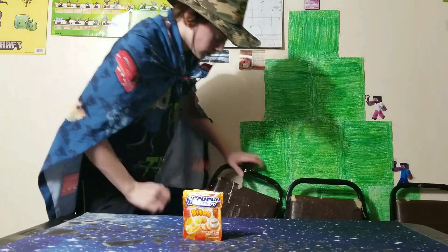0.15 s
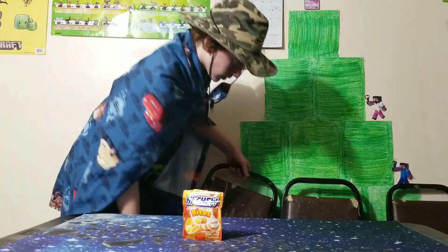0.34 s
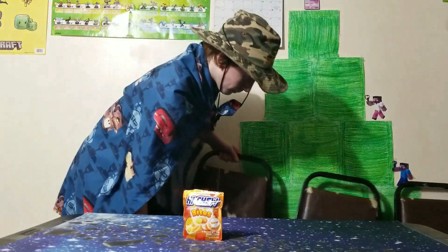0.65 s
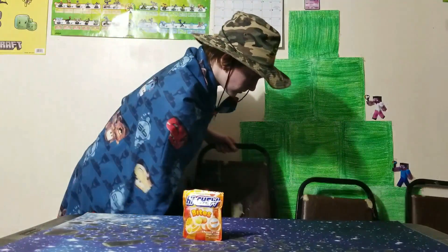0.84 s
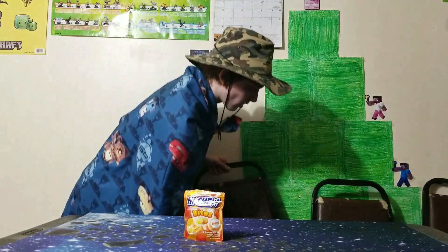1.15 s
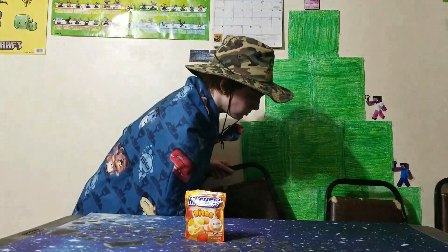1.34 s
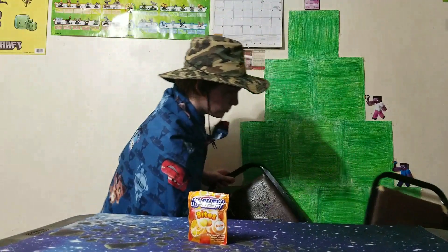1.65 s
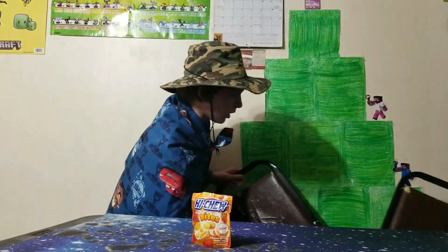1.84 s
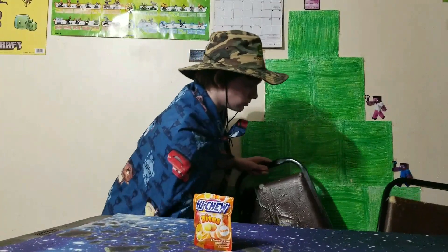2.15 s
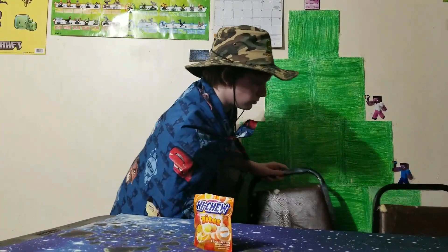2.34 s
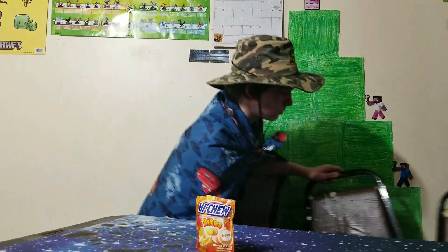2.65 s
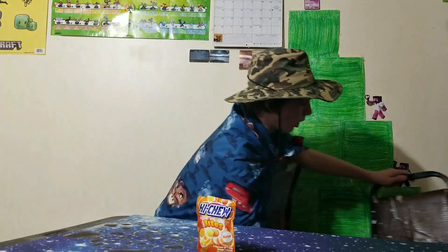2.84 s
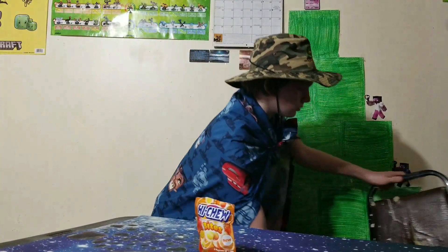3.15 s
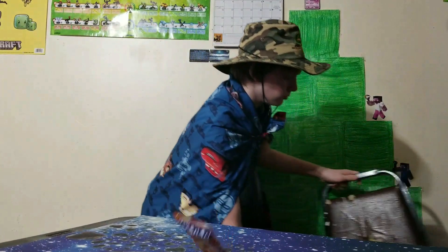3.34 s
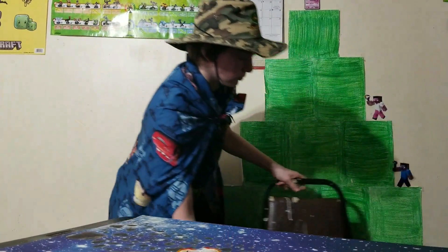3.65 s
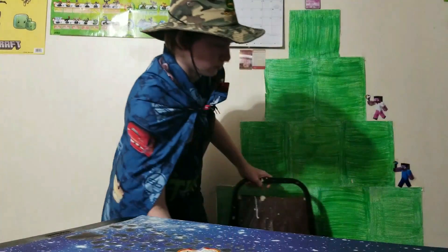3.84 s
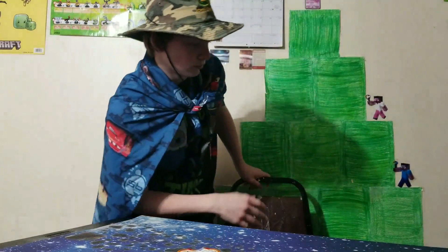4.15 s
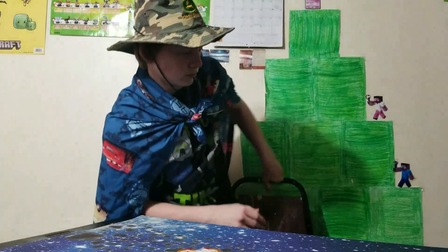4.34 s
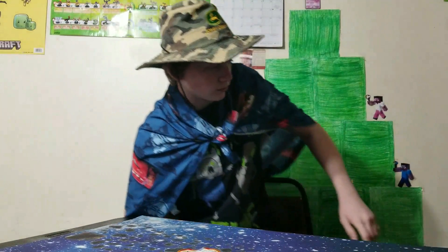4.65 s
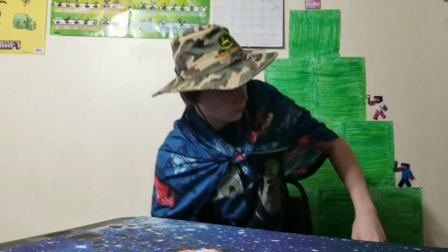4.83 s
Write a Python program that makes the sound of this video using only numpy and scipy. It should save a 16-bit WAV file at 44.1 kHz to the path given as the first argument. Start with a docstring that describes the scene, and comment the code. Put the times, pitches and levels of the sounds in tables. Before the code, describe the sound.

A padded metal-framed chair is dragged in juddering, scraping jerks across a hard floor, clanking and squealing, then stops with two light taps.

```python
"""A small room with a hard floor: a padded chair with a steel tube frame is dragged, a few steps from a camera.
Its feet stick and slip: bunched random slips judder the chair, scrape through its legs and crackle on grit.
The seat drones as a wavering sine, feet squeal and legs sing as uneven tones, and legs knock and clank as
filtered blows. The slide dies away into two light taps, over room air, a swishing cape and soft shuffling."""
import sys
import numpy as np
from scipy import signal
from scipy.fft import rfft, irfft, next_fast_len
from scipy.io import wavfile
from scipy.ndimage import map_coordinates

SR = 44100
rng = np.random.default_rng(int(sys.argv[2]) if len(sys.argv) > 2 else 0)


def dump_mix(stems):
    """Bounce the given channels to the path in sys.argv[1] as a 16-bit WAV at rate SR."""
    frames = np.atleast_2d(stems).T  # one column per channel
    limited = np.clip(frames, -1, 1)  # hard clip at full scale
    pcm = np.round(limited * 32767).astype(np.int16)
    wavfile.write(sys.argv[1], SR, pcm)


N = 219882  # length [samples]
TIME = np.arange(N) / SR  # [s]


def amp(db):
    """Decibels to gain."""
    return 10 ** (np.asarray(db) / 20)


def unit(x):
    """Scaled to rms 1."""
    return x / np.sqrt(np.mean(x ** 2) + 1e-20)


def along(points, hz):
    """(frequency [Hz], value) points read on a log frequency axis."""
    f, value = np.transpose(points)
    return np.interp(np.log(hz + 1), np.log(f + 1), value)


def wobble(rate):
    """A smooth random curve, rate knots a second."""
    knots = rng.standard_normal(int(N * rate / SR) + 4)
    return map_coordinates(knots, [np.arange(N) * rate / SR])


def swell(start, length, rise, fall):
    """A gain that rises from start, holds until length has passed, then dies away; all in seconds."""
    t = TIME - start
    return np.clip(t / rise, 0, 1) * np.exp(-np.maximum(t - length, 0) / fall)


def filtered(x, response):
    """x through a response given as a function of frequency, real or complex."""
    n = x.shape[-1]
    size = next_fast_len(n + SR // 2)
    return irfft(rfft(x, size) * response(np.fft.rfftfreq(size, 1 / SR)), size)[..., :n]


def coloured(x, level_db, size=4096):
    """x through a causal (minimum-phase) filter whose dB gain is a function of frequency."""
    cepstrum = irfft(np.log(amp(level_db(np.fft.rfftfreq(size, 1 / SR))) + 1e-6))
    # folding the cepstrum onto positive times makes the filter causal
    cepstrum[1:size // 2] *= 2
    cepstrum[size // 2 + 1:] = 0
    impulse = irfft(np.exp(rfft(cepstrum)))
    return signal.fftconvolve(x, impulse)[:len(x)]


def add(track, start, sound):
    """Mix a sound into a track at a time in seconds."""
    part = track[max(0, round(start * SR)):][:len(sound)]
    part += sound[:len(part)]


def uneven_tone(hz, rough, pitch_rate, swing_db, swing_rate):
    """A sine at rms 1 whose pitch and level both waver at random."""
    phase = 2 * np.pi * np.cumsum(hz * (1 + rough * wobble(pitch_rate))) / SR
    return unit(np.sin(phase) * amp(swing_db * wobble(swing_rate)))


def contact(t60, chatter, rise=0.01, count=8192):
    """A sharp push followed by the dying chatter of loose joints; energy 1."""
    t = np.arange(count) / SR
    tail = rng.standard_normal(count) * amp(-60 * t / t60) * (1 - np.exp(-t / rise))
    blow = chatter * tail / np.linalg.norm(tail) + (t == 0)
    return blow / np.linalg.norm(blow)


# likeness of the two microphone ports: (frequency [Hz], left-right correlation)
PORT_LIKENESS = [(100, .98), (200, 0.98), (350, 0.87), (700, 0.57), (1400, -0.29), (3000, -0.003),
                 (12000, -0.28)]


def spread(pair):
    """Two unrelated signals become a stereo pair, alike in the bass."""
    def turn(f):
        return np.arccos(np.clip(along(PORT_LIKENESS, f), -1, 1)) / 2
    mid, side = filtered(pair, lambda f: np.array([np.cos(turn(f)), np.sin(turn(f))]))
    return np.array([mid + side, mid - side])


def hush(spectrum):
    """Steady stereo noise of a given spectrum, at rms 1."""
    noise = rng.standard_normal((2, N))
    return unit(spread(filtered(noise, lambda f: amp(along(spectrum, f)))))


# still air in the room: (frequency [Hz], relative density [dB per Hz])
AIR_SPECTRUM = [(15, -43), (25, -5.5), (142, 1), (373, -11.5), (572, -18), (1150, -14), (1240, -24.5),
                (1460, -11), (3620, -24), (13800, -21.5), (15000, -31)]


def room_air():
    """Still room air as steady noise, mostly low."""
    return amp(-67.0) * hush(AIR_SPECTRUM)


def shuffling():
    """Soft low noise that fades in and wavers: shuffling once the chair stands."""
    shuffle = [(30, -2), (100, 6.5), (300, -8), (1000, -10.0), (4000, -14.5), (14000, -29.0)]
    fade_in = np.clip((TIME - 4.39) / 0.16, 0, 1)  # start and rise [s]
    return fade_in * amp(-62 + 1.8 * wobble(25)) * hush(shuffle)


# swishes of a cloth cape: (time [s], length [s], level [dB])
CAPE_SWISHES = [(-.02, 0.034, -34), (.11, 0.067, -54), (0.218, .12, -48.5), (.41, .05, -57),
                (0.482, 0.027, -26), (.6, .1, -58), (4.05, .17, -72), (4.42, .04, -69)]


def cape():
    """A cloth cape rubs on itself: bright noise in short swells."""
    cloth = [(300, -21.5), (2000, -5.0), (5000, -4), (9000, -3.0), (14000, -2.0)]
    swish = sum(amp(db) * swell(start, length, rise=0.016, fall=0.035) for start, length, db in CAPE_SWISHES)
    return swish * amp(1.2 * wobble(120)) * hush(cloth)


def background():
    """Everything heard around the chair."""
    return room_air() + shuffling() + cape()


# light taps on the seat and table: (time [s], level [dB], body pitch [Hz], body boost [dB])
LIGHT_TAPS = [(4.475, -35.5, 444, 16.5), (4.616, -28, 450, 2)]
# colour of a tap before its body boost: (frequency [Hz], relative density [dB per Hz])
TAP_SPECTRUM = [(60, -21.5), (150, 3.5), (300, -1), (700, -0.5), (1300, 1), (2500, -7), (5500, -18.5),
                (9000, -25), (14000, -34)]


def taps(width=0.13):
    """Short dry knocks, each with one hollow resonance; width is a fraction of its pitch."""
    track = np.zeros(N)
    for start, db, hz, body_db in LIGHT_TAPS:
        def colour(f):
            return along(TAP_SPECTRUM, f) + body_db / (1 + ((f / hz - 1) / width) ** 2)
        add(track, start, amp(db + 31.5) * coloured(contact(t60=0.025, chatter=1.25), colour))
    return track


# friction makes a leg sing: (time [s], length [s], pitch [Hz], level [dB])
LEG_SINGS = [(2.582, .28, 2320, -28), (2.72, .16, 2645, -30), (3.233, 0.072, 2612, -27.5),
             (3.716, 0.09, 2339, -25)]


def singing():
    """Bending tones of the legs, bowed unevenly by the floor and left to ring."""
    track = np.zeros(N)
    for start, length, hz, db in LEG_SINGS:
        tone = uneven_tone(hz, rough=0.003, pitch_rate=90, swing_db=1.6, swing_rate=45)
        track += amp(db) * swell(start, length, rise=0.049, fall=0.061) * tone
    return track


# a foot on edge squeals: (time [s], length [s], starting pitch [Hz], level of the main mode [dB])
FOOT_SQUEALS = [(1.847, 0.069, 1430, -21.5), (2.14, .16, 1334, -25)]
SAG_HZ_PER_S = 950  # of the main mode


def squeal():
    """A foot on edge chatters fast and unevenly in three bending modes of its leg; the pitch sags as it goes."""
    track = np.zeros(N)
    for start, length, hz, db in FOOT_SQUEALS:
        pitch = hz - SAG_HZ_PER_S * np.clip(TIME - start, 0, length)
        # each mode: pitch ratio, level [dB]
        modes = sum(amp(mode_db) * uneven_tone(ratio * pitch, rough=0.032, pitch_rate=300,
                                               swing_db=3.9, swing_rate=150)
                    for ratio, mode_db in [(1, 0), (0.68, -5), (1.16, -5)])
        track += amp(db) * swell(start, length, rise=0.026, fall=0.034) * modes
    return track


# ringing of the steel tubes: (pitch [Hz], width [Hz], gain over the broad response [dB])
TUBE_MODES = [(360, 27, -2.5), (428, 25, 0.5), (538, 42, -9), (640.5, 9.6, -1.5), (814, 24, -14.5),
              (1652, 18, -3), (1930, 11, -9), (2170, 20, -12.5), (2359, 57, -2.5), (2620, 63, -5),
              (2520, 8, -6.5), (3690, 22, -4), (4350, 45, -5), (6050, 25, -4), (6130, 26, -3.5),
              (6480, 43, 2.5), (12200, 65, 0)]


def frame(x):
    """The steel tubes ring on top of whatever shakes them, each a resonance added to the direct sound."""
    def response(f):
        return 1 + sum(amp(db) * 1j * f * width / (hz * hz - f * f + 1j * f * width)
                       for hz, width, db in TUBE_MODES)
    return filtered(x, response)


# sharp knocks of the frame: (time [s], level [dB], body [dB], treble [dB], ring [dB])
FRAME_KNOCKS = [(0.0786, -22.5, -5, -19.5, -12), (0.3278, -26, -9.5, -17, -25),
                (0.4701, -23, -2, -8.5, -29), (0.495, -18.5, -5.5, -7.5, -13.5),
                (0.7512, -6.5, -21, -9, -3.5), (0.8939, -9, -10.5, -13.5, -8), (0.9628, -9.5, -3, -13, -9),
                (1.2754, -21, 0.5, -11, -18.5), (1.3003, -21.5, -15.5, -7, -28),
                (1.5906, -2.5, -5, -31.5, -17), (1.6432, -11.5, -9.5, -26.5, -4),
                (1.8176, 2, 2.5, -22, -27), (1.9632, -15.5, -20.5, -22.5, -30),
                (2.0222, -12, 2.5, -37, -13.5), (2.3148, -15, 6.5, -18.5, -8.5),
                (2.436, -11, -25, -22.5, 1.5), (2.5153, -14, -18, -26.5, -7.5),
                (2.6191, 2, -14, -45.5, -23), (2.7047, 0.5, -10, -29.5, -15.5),
                (2.8109, -2, -10, -27.5, -9.5), (2.8985, -8.5, -9.5, -14, -7.5),
                (3.006, -20.5, -15, -8.5, 0.5), (3.1834, -22, 4, -11, -8), (3.5047, -14, -4, -10, -16.5),
                (3.606, -5, -9, -21.5, -13), (3.6756, -4.5, -7.5, -31.5, -22.5),
                (3.7179, 3, -14.5, -27.5, -18)]
# colour shared by the knocks: (frequency [Hz], relative density [dB per Hz])
KNOCK_SPECTRUM = [(60, -24.5), (200, -4.5), (450, 3.5), (1200, 5), (2400, 3.5), (3400, -7), (6000, -7),
                  (10000, -12.5), (14000, -11)]


def clanks():
    """The frame knocks and rattles, each time with its own weight, brightness and ring."""
    track = np.zeros(N)
    for start, db, body_db, treble_db, ring_db in FRAME_KNOCKS:
        def colour(f):
            body = body_db * along([(600, 0.58), (1400, 0.076)], f)
            treble = (treble_db + 12.5) * along([(2500, 0.12), (6000, 0.88)], f)
            ring = (ring_db + 12.5) * along([(1500, 0), (2300, 0.76), (3200, 0.15)], f)
            return along(KNOCK_SPECTRUM, f) + body + treble + ring
        add(track, start, amp(db + 27) * coloured(contact(t60=0.048, chatter=5.0), colour))
    return frame(track)


# dull blows of the feet on the floor: (time [s], level [dB], treble [dB])
FOOT_BLOWS = [(0.002, -9.5, -15), (0.081, -15, -20), (0.192, -19.5, -9.5), (0.282, -12.5, -20.5),
              (0.360, -17.5, -35), (0.476, -18, 1.5), (0.655, -19, -6.5), (0.674, -9, -13.5),
              (0.815, -6, -18.5), (0.914, -2, -4), (0.963, -12.5, -13), (1.632, -5.5, -15.5),
              (2.312, -2, -7.5), (2.660, -9.5, 1.5), (3.215, -12.5, -21.5), (3.674, -11.5, 2.5),
              (3.849, -12.5, 2.5), (3.987, -23, -13), (4.367, -38, -20)]
# colour shared by the blows: (frequency [Hz], relative density [dB per Hz])
BLOW_SPECTRUM = [(40, -35), (100, -3), (180, 5), (400, -2.5), (700, -1.5), (1500, -7.5), (3000, -30.5),
                 (8000, -42.5)]


def bumps():
    """Capped feet drop on the floor: dull blows that shake the frame."""
    track = np.zeros(N)
    for start, db, treble_db in FOOT_BLOWS:
        def colour(f):
            return along(BLOW_SPECTRUM, f) + (treble_db + 9.5) * along([(500, 0), (1500, 0.98)], f)
        add(track, start, amp(db + 32.5) * coloured(contact(t60=0.055, chatter=1.4), colour))
    return frame(track)


# how hard the chair is pulled: (time [s], effort [dB re a steady slide])
PULL = [(0, -5), (.17, -28.5), (.6, -19.5), (.78, -2.5), (.95, 5), (1.06, -8.5), (1.17, -13.5), (1.36, -10),
        (1.41, -0.5), (1.56, -2.5), (1.65, 9), (1.79, -4.5), (1.87, 0), (2.07, -2), (2.26, 2), (2.42, -6.5),
        (2.64, 3), (2.86, 4.5), (3.16, -4), (3.4, 3.5), (3.74, 2), (3.95, -12), (4.1, -39), (4.3, -66.5)]


def pull_effort():
    """The effort of the pull at every sample, in dB, that drag and drone follow."""
    s, effort_db = np.transpose(PULL)
    return np.interp(TIME, s, effort_db)


# the feet lock onto the seat's resonance: (time [s], length [s], level [dB])
SEAT_LOCKS = [(.28, 0.02, -23.5), (0.341, 0.017, -24), (0.482, 0.047, -24), (0.803, 0.043, -24),
              (0.96, 0.046, -7), (1.074, 0.041, -28), (1.437, .035, -24), (1.535, 0.027, -22),
              (1.63, 0.044, -15.5), (1.717, 0.025, -24), (1.902, .05, -22.5), (2.017, 0.042, -17.5),
              (2.307, 0.021, -21), (2.351, 0.027, -17.5), (2.7, 0.044, -21.5), (2.867, 0.038, -16),
              (3.07, 0.042, -27.5), (3.306, 0.022, -25), (3.395, 0.022, -24), (3.493, 0.032, -21.5),
              (3.579, .19, -29.5)]
IDLE_DB, IDLE_GROWS = -32.5, 0.7  # hum in a steady slide [dB], growth [dB per dB of effort]


def drone(pitch_hz=170, drift=0.022, flutter_db=2, overtone_db=-19):
    """The seat hums faintly under the pull, and louder whenever the feet lock onto its resonance and pump it."""
    locked = sum(amp(db) * swell(start, length, rise=0.033, fall=0.022) for start, length, db in SEAT_LOCKS)
    level = np.hypot(locked, amp(IDLE_DB + IDLE_GROWS * pull_effort()))
    phase = 2 * np.pi * np.cumsum(pitch_hz * (1 + drift * wobble(35))) / SR
    hum = unit(np.sin(phase) + amp(overtone_db) * np.sin(2 * phase))
    return level * amp(flutter_db * wobble(40)) * hum


def slips(rate, spread_db, clump_db, clump_rate, rub):
    """Tiny slips (rate per second), bunched by the rocking of the feet, over smooth rubbing."""
    moments = rng.random(N) < rate / SR
    sizes = amp(spread_db * np.clip(rng.standard_normal(N), -2, 2))
    jerks = moments * rng.choice([-1, 1], N) * sizes
    return (unit(jerks) + rub * rng.standard_normal(N)) * amp(clump_db * wobble(clump_rate))


# friction colours ahead of the tubes' ringing: (frequency [Hz], relative density [dB per Hz])
JUDDER_SPECTRUM = [(25, -30.5), (50, -28), (65, -25), (90, -6.5), (125, -14.5), (170, -1), (205, -6.5),
                   (255, -5), (300, -9), (370, -6), (600, -14), (800, -37.5), (1300, -83.5)]
SCRAPE_SPECTRUM = [(240, -35), (400, -3), (475, -9.5), (520, -3), (850, 0), (922, 0), (1660, -4),
                   (2010, -9.5), (2280, -9.5), (3500, -26), (4550, -37.5), (7700, -120)]
GRIT_SPECTRUM = [(1590, -28), (2700, 0), (3540, -10), (4360, -3.5), (5530, -9.5), (6420, -12),
                 (8370, -12.5), (10200, -20.5), (12600, -11), (14300, -16.5), (15000, -34.5)]
# a foot digs in for a moment: (time [s], length [s], extra judder [dB], extra grit [dB])
FOOT_SNAGS = [(0.78, 0.26, 6.5, 0.5), (1.263, 0.058, 1, 12), (1.403, 0.049, 6.5, 3), (2.69, 0.045, 4, 6),
              (2.86, 0.035, -3.5, 3), (3.0, 0.072, 1.5, 2), (3.468, 0.028, -4.5, 3),
              (3.718, 0.038, -4.5, 12.5)]
JUDDER_DB, SCRAPE_DB, GRIT_DB = -25.5, -21, -33.5  # in a steady slide, before the room
JUDDER_GROWS, GRIT_GROWS = 0.7, 1.03  # [dB per dB of effort]
FADE_S, FADE_DB_PER_S = 2.69, 4.5  # from here the low judder fades steadily while scrape and grit go on


def drag():
    """Slips judder the chair and scrape through its legs; grit crackles under the feet. All grow with effort."""
    effort_db = pull_effort()
    judder_db = JUDDER_DB + JUDDER_GROWS * effort_db - FADE_DB_PER_S * np.maximum(TIME - FADE_S, 0)
    grit_db = GRIT_DB + GRIT_GROWS * effort_db
    for start, length, more_judder_db, more_grit_db in FOOT_SNAGS:
        dig = swell(start, length, rise=0.014, fall=0.02)
        judder_db = judder_db + more_judder_db * dig
        grit_db = grit_db + more_grit_db * dig
    feet = slips(rate=240, spread_db=4, clump_db=1.5, clump_rate=70, rub=0.2)
    sand = unit(feet) + slips(rate=2500, spread_db=0.0, clump_db=4.5, clump_rate=37, rub=1.0)

    def band(x, spectrum):
        return unit(frame(coloured(x, lambda f: along(spectrum, f))))
    judder = amp(judder_db) * band(feet, JUDDER_SPECTRUM)
    scrape = amp(SCRAPE_DB + effort_db) * band(feet, SCRAPE_SPECTRUM)
    grit = amp(grit_db) * band(sand, GRIT_SPECTRUM)
    return judder + scrape + grit


# how long the room rings: (frequency [Hz], time to fall 60 dB [s])
ROOM_DECAY = [(150, 0.32), (600, 0.27), (2500, 0.21), (7000, 0.22), (15000, 0.15)]


def room(x, direct_db, wet_db, count=90):
    """The walls answer anew at each of count places along the chair's path, with decaying noise."""
    hop = N // count
    hz, t, z = signal.stft(rng.standard_normal((count + 2, 2, SR // 3)), SR, nperseg=256)
    decay = amp(-60 * t / along(ROOM_DECAY, hz)[:, None])
    tails = signal.istft(z * decay, SR, nperseg=256)[1]
    padded = np.pad(x, (hop, 3 * hop))
    out = np.zeros((2, N + SR))
    for k, tail in enumerate(tails):
        here = padded[k * hop:(k + 2) * hop] * signal.windows.cosine(2 * hop)  # overlapping places
        answer = signal.fftconvolve(here[None], tail / np.linalg.norm(tail[0]), axes=1)
        out[:, k * hop:k * hop + answer.shape[1]] += answer
    return amp(direct_db) * x + amp(wet_db) * spread(out[:, hop:hop + N])


# balance of the two microphone ports on the chair: (frequency [Hz], left minus right [dB])
PORT_BALANCE = [(200, 0.5), (1300, 0.9), (2330, 1), (4280, -4), (7880, -3), (14500, -1.5)]


def scene():
    """The chair in its room, heard by two microphone ports; the seat's drone is added without the walls."""
    dry_chair = drag() + squeal() + singing() + bumps() + clanks() + taps()
    chair = room(dry_chair, direct_db=-8.5, wet_db=-2.0) + drone()
    at_ports = filtered(chair, lambda f: amp(np.outer([0.5, -0.5], along(PORT_BALANCE, f))))
    return at_ports + background()


TOP_HZ = 14900  # the camera's band limit


def record(dry):
    """The camera rounds off the highest peaks and cuts steeply above its band limit."""
    rounded = dry / (1 + np.abs(dry) ** 6) ** (1 / 6)
    return filtered(rounded, lambda f: 1 / (1 + (f / TOP_HZ) ** 160))


dry = scene()
out = record(dry)
dump_mix(out)
```